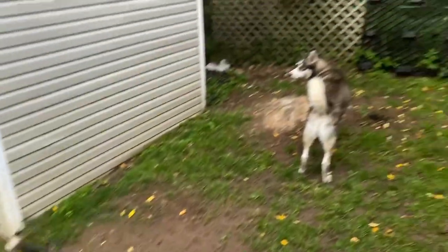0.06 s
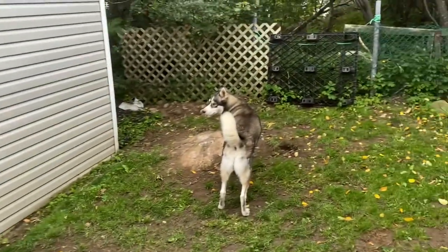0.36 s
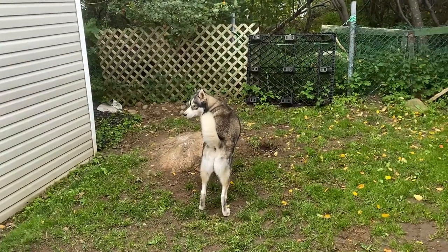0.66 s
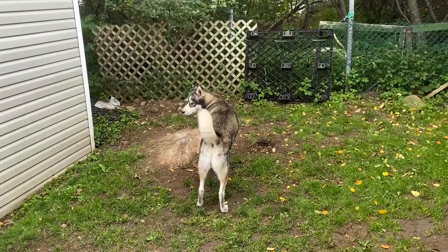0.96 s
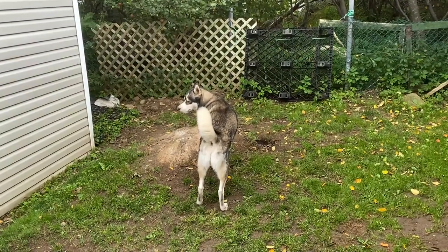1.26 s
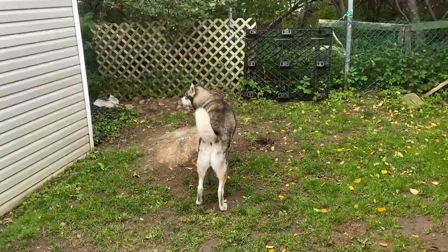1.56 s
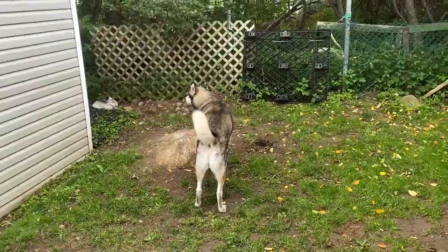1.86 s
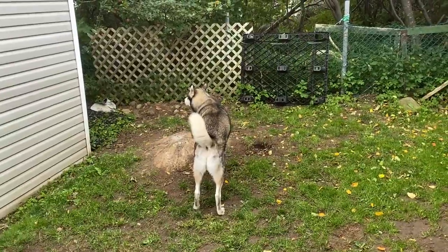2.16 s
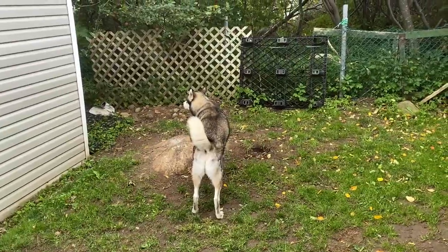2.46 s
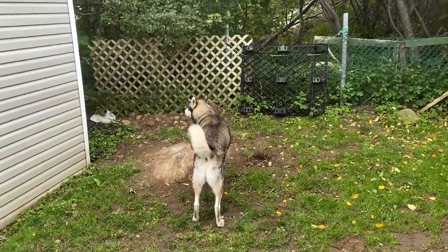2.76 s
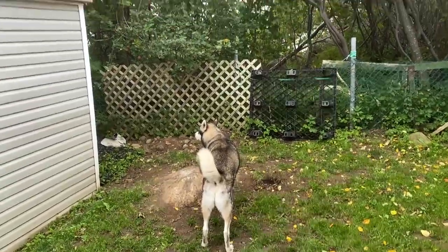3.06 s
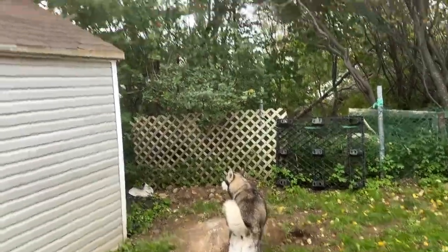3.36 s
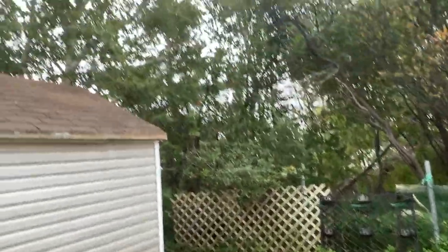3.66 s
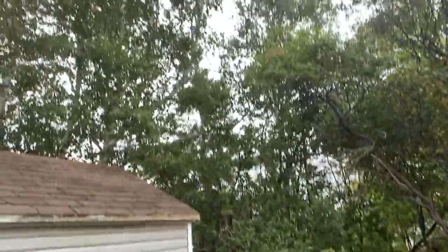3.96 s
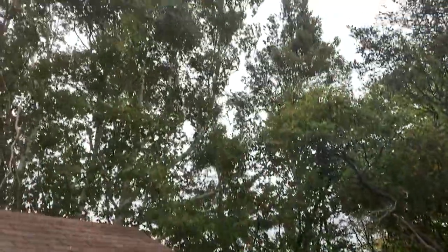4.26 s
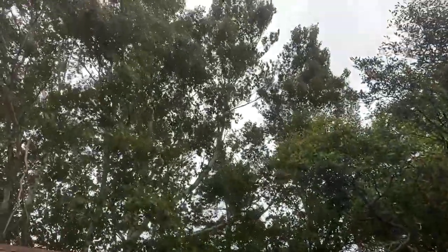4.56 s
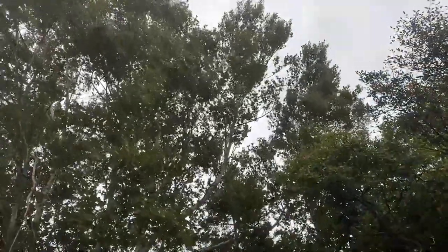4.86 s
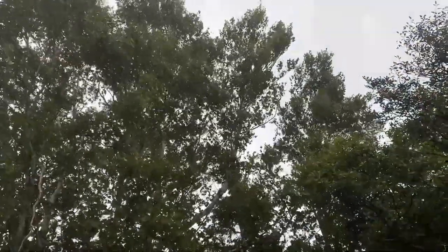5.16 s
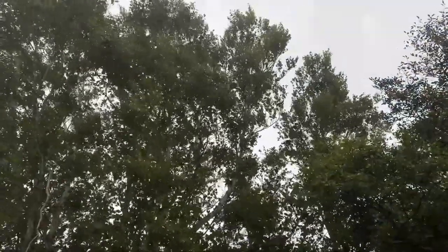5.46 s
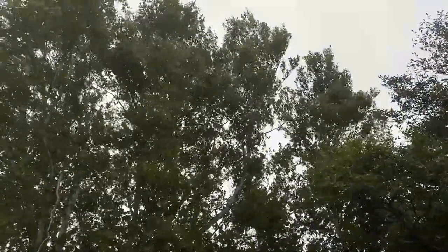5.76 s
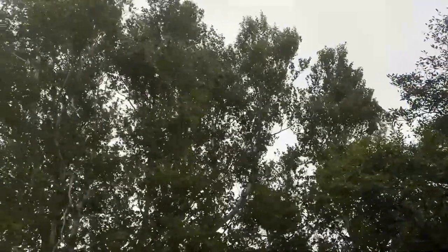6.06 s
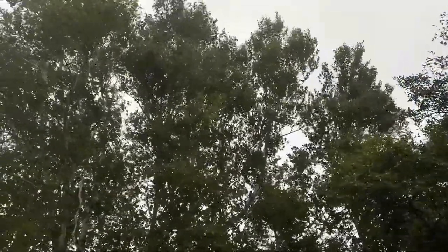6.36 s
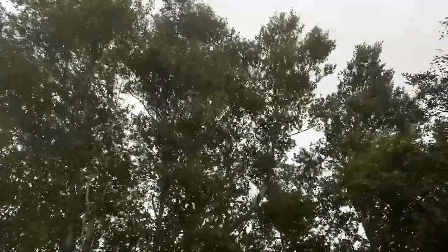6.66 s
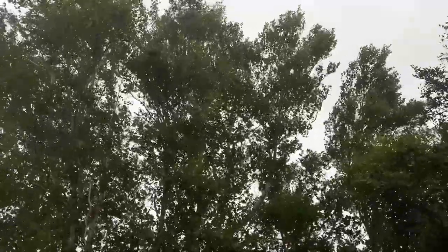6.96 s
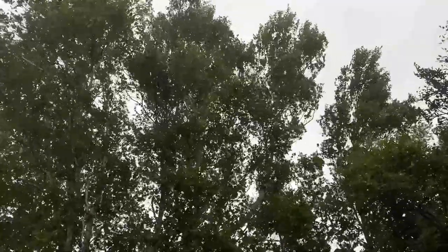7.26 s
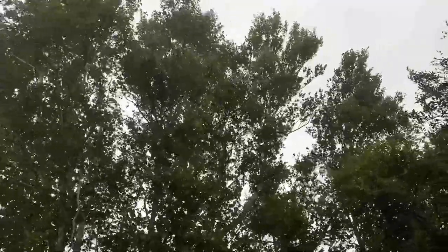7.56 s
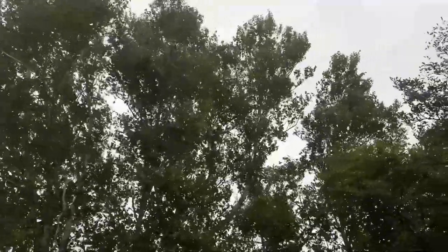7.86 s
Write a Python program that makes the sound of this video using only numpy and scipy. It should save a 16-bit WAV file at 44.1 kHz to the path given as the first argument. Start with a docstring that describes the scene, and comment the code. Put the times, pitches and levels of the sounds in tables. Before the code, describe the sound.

Low, uneven wind thumps hit a hand-held microphone in a backyard while tall trees rustle continuously beyond it. The leafy hiss and a hollow rush from the treetops grow louder and brighter in a first gust, settle slightly, and rise in a second one. Short bursts of bass buffeting keep breaking in close up.

```python
"""Strong wind in a row of tall leafy trees behind a backyard, rising in two long gusts.
Countless leaf impacts add incoherently to a hiss, over the duller roar of vortex shedding
in the branches and three broad bands of aeolian sound from the crowns. Near the ground,
eddies tumble over the two ports of a hand-held microphone, and their pressure thumps in the bass."""
import sys
import numpy as np
from scipy import signal
from scipy.fft import rfft, irfft, next_fast_len
from scipy.io import wavfile
from scipy.ndimage import uniform_filter1d

SR = 44100
rng = np.random.default_rng(int(sys.argv[2]) if len(sys.argv) > 2 else 0)


def to_wav(s):
    """Save 16-bit WAV."""
    ch = np.atleast_2d(s).T  # columns
    pcm = np.round(np.clip(ch, -1, 1) * 32767)  # PCM
    wavfile.write(sys.argv[1], SR, pcm.astype(np.int16))


N = 353241
TIME = np.arange(N) / SR
SIZE = next_fast_len(N, real=True)
FREQ = np.arange(SIZE // 2 + 1) * SR / SIZE


# Gusts in the foliage: t/s, relative level/dB
LEAF_GUSTS = [(0.0, -46), (1.45, -44), (2.92, -40), (4.19, -40), (5.61, -44), (6.73, -42), (7.0, -40),
              (7.84, -38), (8.0, -39)]
# Spectrum of the leaf hiss: f/Hz, relative level/dB
LEAF_SPECTRUM = [(700, -9.5), (1300, -0.5), (1900, 0), (2900, 0), (4000, -2), (5000, -2.5), (6200, -5.5),
                 (8000, -5.5), (10000, -9.5), (12000, -11), (14000, -16.5), (15700, -17.5)]

def leaves(brightening, level_db):
    """Shot noise: leaves tap at random, and a gust makes the taps denser, louder and brighter."""
    gust_db, = in_time(LEAF_GUSTS)
    excess_db = gust_db - gust_db.mean()
    taps_per_sample = 120000 * from_db(excess_db) / SR
    tap_counts = rng.poisson(taps_per_sample, (2, N))
    taps = np.sqrt(tap_counts / taps_per_sample) * rng.standard_normal((2, N))
    spectra = at_ports(taps, LEAF_SPECTRUM) * FREQ / np.hypot(FREQ, 400)
    hiss = swaying(spectra, 1240, 16000, spread_db=0.78, rate=15, tilt_db=brightening * excess_db, bands=12)
    shiver_db = 0.17 * drift(12)  # whole sprays of leaves shake together
    return hiss * from_db(gust_db + level_db + shiver_db)


# Roar of air through the branches: t/s, relative level/dB
BRANCH_LEVELS = [(0, -47.5), (.8, -46), (3.3, -44), (4.4, -46.5), (5.0, -46.5), (5.8, -46), (6.7, -45),
                 (7.1, -43), (7.7, -44.5), (8, -49.5)]
# Spectrum of the roar: f/Hz, relative level/dB
BRANCH_SPECTRUM = [(60, -6), (150, -10), (280, 3), (430, -2), (700, 0), (950, -3), (1200, -8.5),
                   (1600, -10.5), (3000, -27)]

def branches(level_db):
    """Vortex shedding: twigs and boughs radiate a broad roar whose spectrum wanders."""
    roar_db, = in_time(BRANCH_LEVELS)
    spectra = at_ports(rng.standard_normal((2, N)), BRANCH_SPECTRUM)
    spectra = spectra * FREQ / np.hypot(FREQ, 60) / np.hypot(1, FREQ / 4000)
    roar = swaying(spectra, 198, 1760, spread_db=1.5, rate=3.5, tilt_db=3.5, bands=10)
    return roar * from_db(roar_db + level_db)


# Bands of the deep, high and middle crowns: centre f/Hz, bandwidth/Hz
CROWN_BANDS = [(638.8, 450), (1142, 370), (780, 290)]
# Air through the deep crown: t/s, relative level/dB, centre f/Hz
DEEP_CROWN_FLOW = [(0, -53.5, 640), (1.5, -47.5, 628.6), (2.4, -45.5, 621), (3.2, -38.5, 588.5),
                   (3.9, -43.5, 611), (4.35, -47.5, 679.5), (4.7, -47, 671), (5.3, -53, 619.7),
                   (6.0, -48, 430.3), (6.8, -45.5, 422.7), (7.6, -51, 423), (7.85, -62, 419)]
# Air through the high crown: t/s, relative level/dB
HIGH_CROWN_FLOW = [(0, -61), (2.0, -54.5), (3.4, -50.5), (4.3, -50.5), (5.0, -56), (5.5, -50), (5.9, -58),
                   (6.6, -52.5), (7.3, -47), (8, -47.5)]
# Brief surges through the middle crown: t/s, relative level/dB
MIDDLE_CROWN_SURGES = [(2.72, -43), (3.15, -41), (3.8, -42.5), (4.1, -49), (7.25, -47)]

def crowns(level_db, spread_db, surge_s):
    """Aeolian sound: each crown sings in a band set by its twig thickness; the deep one sinks in pitch."""
    deep_db, deep_hz = in_time(DEEP_CROWN_FLOW)
    high_db, = in_time(HIGH_CROWN_FLOW)
    surges = sum(from_db(db) * np.exp(-0.5 * ((TIME - t) / surge_s) ** 2) for t, db in MIDDLE_CROWN_SURGES)
    deep, high, middle = [filtered(rng.standard_normal(N), band_pass(*band)) for band in CROWN_BANDS]
    glide_position = np.cumsum(deep_hz / CROWN_BANDS[0][0]) % N
    deep = np.interp(glide_position, np.arange(N), deep)
    voices = (deep, from_db(deep_db)), (high, from_db(high_db)), (middle, surges)
    return sum(unit_rms(band) * gain * from_db(level_db + spread_db * drift(20)) for band, gain in voices)


def swaying(spectra, low_hz, high_hz, spread_db, rate, tilt_db, bands):
    """Amplitude modulation: boughs sway independently, so each band wavers; tilt_db favours the treble."""
    band_position = np.interp(np.log(FREQ + 1), np.log([low_hz, high_hz]), [0, bands - 1])
    out = 0
    for k in range(bands):
        band = irfft(spectra * np.maximum(1 - abs(band_position - k), 0), SIZE)[:, :N]
        band_db = spread_db * drift(rate) + tilt_db * (k / (bands - 1) - 0.5)
        out = out + band * from_db(band_db)
    return unit_rms(out)


# Midrange of the trees: t/s, relative level/dB
MIDRANGE_LEVELS = [(5.5, -0.5), (5.8, -5), (6.1, 0.5), (6.7, -8), (7.15, -3), (7.55, -2.5), (8, 5)]

def midrange_dips(trees, centre_hz, width_hz):
    """Time-varying filtering: late on, the middle of the roar dips twice, then swells."""
    middle = filtered(trees, band_pass(centre_hz, width_hz))
    middle_db, = in_time(MIDRANGE_LEVELS)
    return trees + middle * (from_db(middle_db) - 1)


# Sound of the trees at the two ports: f/Hz, correlation, phase lead of the left/rad
PORT_COHERENCE = [(50, -1, 0.5), (377, 0.33, 0), (610, -0.26, 0), (1090, -0.066, 0), (1550, -0.24, 0),
                  (2720, 0.4, 0.97), (3920, 0.49, 0), (5600, 0.096, 0.5), (6300, 0.59, .5), (7240, 1, -0.5),
                  (9360, 1, -3.5), (11440, 0.79, -7), (14500, 0.76, -11)]
# Balance between the ports: f/Hz, left minus right level/dB
PORT_BALANCE = [(200, -1), (700, 2), (1300, .5), (2400, 1.4), (4400, 4), (8000, 0.3), (15000, -0.5)]

def at_ports(pair, spectrum):
    """Partial coherence: two noises give the spectra of a wide source whose top leads on the right."""
    hz, correlation, lead = np.transpose(PORT_COHERENCE)
    correlation = np.clip(np.interp(FREQ, hz, correlation), -0.99, 0.99)
    leftward = np.exp(0.5j * np.interp(FREQ, hz, lead)) * np.sqrt(spectral_gain(PORT_BALANCE))
    mid, side = rfft(pair, SIZE) * np.sqrt([1 + correlation, 1 - correlation])
    return np.array([(mid + side) * leftward, (mid - side) / leftward]) * spectral_gain(spectrum)


# Draught at the microphone: t/s, relative level/dB
DRAUGHT_LEVELS = [(0.0, -47), (0.22, -52.5), (0.45, -49), (1.0, -47.5), (1.6, -46.5), (2.32, -45),
                  (2.85, -46), (3.34, -39), (3.75, -41), (4.3, -51.5), (4.8, -50), (5.1, -45), (5.4, -50.5),
                  (5.7, -44), (6.45, -46), (6.72, -49), (7.0, -37.5), (7.55, -39.5), (7.77, -42),
                  (7.79, -50), (8.0, -50)]
# Single eddies, and at 4.11 s and 4.95 s two brief low swells that play the same way: t/s, duration/s, then
# relative level/dB of rumble, flutter and rasp
EDDY_PASSAGES = [(0.075, 0.03, -38.5, -53, -62), (0.302, 0.045, -39, -40.5, -63),
                 (0.362, 0.02, -28, -42, -56), (0.405, 0.029, -33, -36, -46), (0.5, 0.033, -39, -50, -58),
                 (0.57, 0.025, -36, -48, -60), (0.69, 0.04, -44, -43, -58), (0.834, 0.024, -36, -34, -55),
                 (0.86, 0.032, -34, -45, -56), (0.932, 0.023, -40, -37, -56), (1.059, .02, -39, -40, -59),
                 (1.199, 0.016, -32.5, -41, -56), (1.317, 0.02, -37, -44, -58),
                 (1.518, 0.022, -31.5, -38.5, -47), (1.814, 0.038, -30.5, -35, -60),
                 (1.862, 0.022, -34, -41, -59), (1.995, .025, -37, -48, -52), (2.084, 0.024, -33, -44, -55),
                 (2.248, 0.017, -31.5, -34, -55), (2.34, 0.032, -32, -40, -58),
                 (2.421, 0.029, -33, -54, -60), (2.509, 0.014, -27.5, -37, -43),
                 (2.999, 0.12, -55, -41, -55), (3.118, 0.023, -48, -37, -52.5),
                 (3.263, 0.021, -31, -32, -51), (3.398, 0.044, -25, -24.5, -31),
                 (3.58, 0.015, -36, -35.5, -52), (3.694, .014, -37, -33.5, -49),
                 (3.867, 0.017, -32, -35, -56), (4.109, 0.088, -48, -43, -47),
                 (4.948, 0.087, -60, -42.5, -61), (5.173, 0.05, -41, -40, -41.5),
                 (5.208, 0.021, -33, -23, -36), (5.228, 0.018, -26.5, -50, -60),
                 (5.275, 0.037, -37, -45, -60), (5.47, 0.029, -32, -57, -56),
                 (5.597, 0.015, -26, -25.5, -45), (5.633, 0.022, -22.5, -36, -52),
                 (5.677, 0.03, -30, -54, -62), (5.78, 0.024, -34, -42, -59),
                 (5.909, 0.028, -29, -33.5, -44), (6.038, 0.052, -35.5, -41, -52),
                 (6.121, 0.031, -28, -34, -45), (6.306, 0.023, -25, -27, -45), (6.36, 0.024, -29, -44, -53),
                 (6.391, 0.023, -31, -46, -50), (6.45, 0.02, -39, -55, -65),
                 (6.554, 0.066, -35.5, -55, -65), (6.871, 0.025, -33, -34, -43),
                 (6.945, 0.051, -34.5, -30.5, -45), (6.998, .016, -29, -42, -50),
                 (7.029, 0.019, -30, -23.5, -35), (7.065, .025, -30, -40, -55),
                 (7.11, 0.018, -33, -29, -42), (7.208, 0.017, -32, -25.5, -38),
                 (7.26, 0.026, -39, -39, -42), (7.3, .02, -28, -39, -42), (7.427, 0.025, -31, -33, -55),
                 (7.505, 0.036, -31.5, -31.5, -50), (7.62, 0.025, -36, -34, -52),
                 (7.655, 0.017, -35, -29, -49), (7.749, 0.044, -34, -28, -53), (7.771, 0.01, -31, -35, -50),
                 (7.988, 0.031, -36, -47, -58)]
# Spectra of the draught and of the eddies' rumble, flutter and rasp: f/Hz, relative level/dB
DRAUGHT_SPECTRUM = [(20, -34), (30, -29), (42, -7.5), (60, 0), (82, -0.5), (120, -5), (175, -9.5),
                    (260, -34), (500, -50)]
RUMBLE_SPECTRUM = [(20, -34), (30, -28), (42, -7), (60, -0.5), (82, -0.5), (125, -4), (175, -8), (260, -32),
                   (500, -57)]
FLUTTER_SPECTRUM = [(90, -18), (170, -0.5), (230, 0.5), (300, -.5), (420, -6), (540, -23.5), (800, -22),
                    (1400, -37), (3000, -66)]
RASP_SPECTRUM = [(300, -15), (440, 2), (520, 5), (680, -2), (1000, -9.5), (1500, -19), (3000, -46)]
WAKE_DELAY_S, WAKE_STRETCH = 0.0051, 1.24

def buffeting(draught_db, flutter_db, draught_swing_db, flutter_swing_db, lump_rate):
    """Pseudo-sound: over a lumpy draught, each eddy flutters, the fastest rasp, and the wake rumbles."""
    strength_db, = in_time(DRAUGHT_LEVELS)
    excess_db = strength_db - strength_db.mean()
    lumps = np.tanh(drift(lump_rate))
    draught_gain = from_db(draught_db + 0.99 * excess_db + draught_swing_db * lumps)
    flutter_power = from_db(flutter_db + 0.73 * excess_db + flutter_swing_db * lumps) ** 2
    rumble_power, rasp_power = np.zeros((2, N))
    for t, duration, wake_db, front_db, rasp_db in EDDY_PASSAGES:
        near = slice(*np.searchsorted(TIME, [t - 4 * duration, t + 4 * duration]))
        age = TIME[near] - t
        front = eddy_envelope(age, duration)
        wake = eddy_envelope(age - WAKE_DELAY_S, duration * WAKE_STRETCH)
        rumble_power[near] += wake * from_db(wake_db) ** 2
        flutter_power[near] += front * from_db(front_db) ** 2
        rasp_power[near] += front * from_db(rasp_db) ** 2
    return (draught_gain * turbulence(DRAUGHT_SPECTRUM, steady_s=0.046)
            + np.sqrt(rumble_power) * turbulence(RUMBLE_SPECTRUM, steady_s=0.033)
            + np.sqrt(flutter_power) * turbulence(FLUTTER_SPECTRUM, steady_s=0.029)
            + np.sqrt(rasp_power) * turbulence(RASP_SPECTRUM, steady_s=0.01))


def eddy_envelope(age, duration, steepness=6.5):
    """Convection: as an eddy is carried past, its power rises quickly, holds and falls."""
    return 1 / (1 + np.abs(2 * age / duration) ** steepness)


# Likeness of the turbulent pressure at the two ports: t/s, correlation
TURBULENCE_CORRELATION = [(0, 0.85), (2.4, 0.82), (3.0, 0.4), (3.5, 0.87), (4.2, 0), (4.8, 0.12),
                          (5.25, 0.64), (5.7, 0.72), (8, 0)]

def turbulence(spectrum, steady_s):
    """Spatial correlation: the ports share part of a pressure noise, its power evened over steady_s."""
    correlation, = in_time(TURBULENCE_CORRELATION)
    gain = spectral_gain(spectrum) / np.hypot(1, (FREQ / 2500) ** 2)
    noise = filtered(rng.standard_normal((2, N)), gain)
    window = int(steady_s * SR)
    local_power = uniform_filter1d(uniform_filter1d(noise ** 2, window), window)
    mid, side = noise / np.sqrt(local_power + 1e-20)
    side = side * np.sqrt((1 - correlation) / (1 + correlation))
    return np.array([mid + side, mid - side])


# Pressure pulses in the tightest eddies: t/s, relative level/dB, spectral peak f/Hz
VORTEX_PULSES = [(3.38, -11.5, 200), (3.591, -26, 85), (3.701, -24.5, 200), (5.203, -16, 269),
                 (5.597, -14, 240), (5.906, -20.5, 300), (5.918, -21, 85), (6.114, -23.5, 249.7),
                 (6.313, -23, 130), (6.349, -20, 220), (7.106, -17.5, 240), (7.3, -25, 190),
                 (7.778, -22, 110)]

def vortex_slaps():
    """Bipolar pressure pulse: a vortex crosses the ports with a push and a pull, deeper if it is wider."""
    pressure = np.zeros(N)
    for t, level_db, hz in VORTEX_PULSES:
        near = slice(*np.searchsorted(TIME, [t - 2 / hz, t + 2 / hz]))
        phase = 2 * np.pi * hz * (TIME[near] - t)
        pressure[near] -= from_db(level_db) * phase * np.exp((1 - phase ** 2) / 2)
    return signal.sosfilt(signal.butter(2, 35, "high", fs=SR, output="sos"), pressure)


def from_db(db):
    """Amplitude ratio of a level in decibels."""
    return 10 ** (np.asarray(db) / 20)


def unit_rms(x):
    """Normalisation to unit mean power."""
    return x / np.sqrt(np.mean(x ** 2) + 1e-20)


def in_time(rows):
    """Linear interpolation of each column at every sample."""
    times, *columns = np.transpose(rows)
    return [np.interp(TIME, times, column) for column in columns]


def spectral_gain(spectrum):
    """Gain per bin, by interpolation of levels over log frequency."""
    hz, db = np.transpose(spectrum)
    return from_db(np.interp(np.log(FREQ + 1e-9), np.log(hz), db))


def band_pass(centre_hz, width_hz):
    """Flat-topped response, width_hz wide at half amplitude."""
    detuning = (FREQ - centre_hz ** 2 / (FREQ + 1)) / width_hz
    return 1 / (1 + detuning ** 4)


def filtered(x, gain):
    """Convolution theorem: filtering multiplies the spectrum by a gain per bin."""
    return irfft(rfft(x, SIZE) * gain, SIZE)[..., :N]


def drift(rate):
    """Low-pass random process of unit spread, changing about rate times a second."""
    hop, settling = 40, 2000
    pole = np.exp(-2 * np.pi * rate * hop / SR)
    noise = rng.standard_normal(N // hop + settling + 2)
    slow = signal.lfilter([1], [1, -2 * pole, pole * pole], noise)[settling:]
    return np.interp(np.arange(N) / hop, np.arange(len(slow)), unit_rms(slow))


def scene():
    """Superposition: sound from distant trees adds to wind pressure at the microphone."""
    trees = leaves(brightening=0.43, level_db=3.0) + branches(level_db=5.5)
    trees += crowns(level_db=-1.5, spread_db=2.0, surge_s=0.072)
    wind = buffeting(draught_db=-43, flutter_db=-45, draught_swing_db=4.5, flutter_swing_db=5, lump_rate=20)
    return midrange_dips(trees, centre_hz=724, width_hz=280) + wind + vortex_slaps()


def record(dry):
    """Mid-side filtering narrows the bass to the centre late on; a low-pass cuts the top throughout."""
    narrow_from_s, narrow_below_hz, cutoff_hz = 5.7, 427, 15700
    mid, side = (dry[0] + dry[1]) / 2, (dry[0] - dry[1]) / 2
    side_bass = filtered(side, 1 / (1 + (FREQ / narrow_below_hz) ** 6))
    narrowing = np.clip((TIME - narrow_from_s) / 0.04 + 0.5, 0, 1)
    side = side - narrowing * side_bass
    low_pass = signal.ellip(10, 0.1, 80, cutoff_hz, fs=SR, output="sos")
    return signal.sosfilt(low_pass, [mid + side, mid - side])


dry = scene()
out = record(dry)
to_wav(out)
```